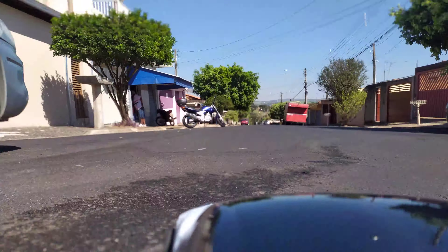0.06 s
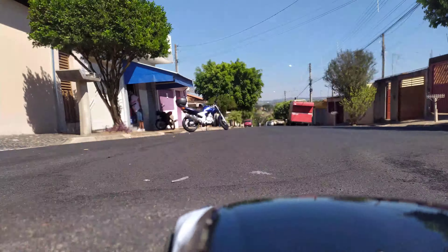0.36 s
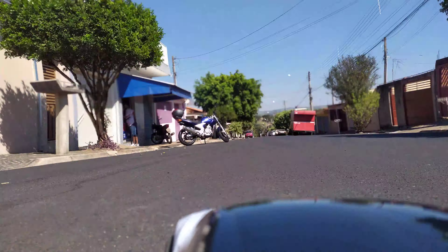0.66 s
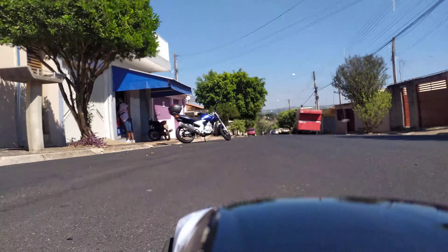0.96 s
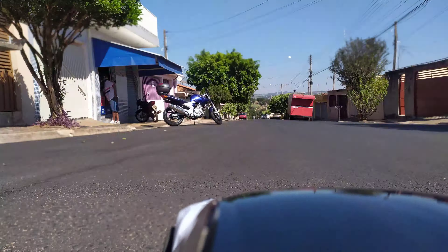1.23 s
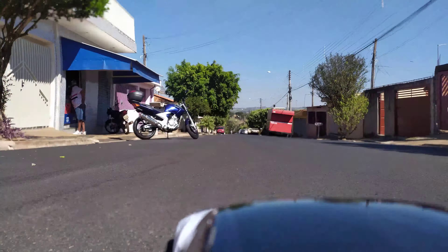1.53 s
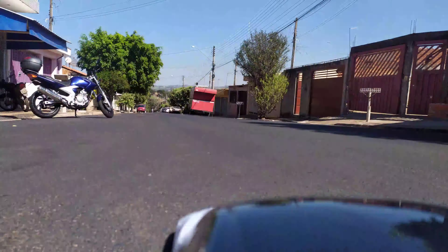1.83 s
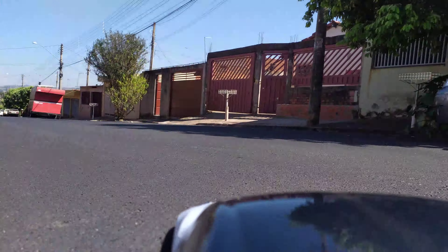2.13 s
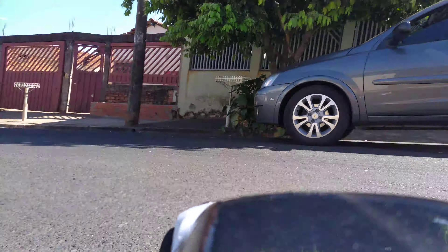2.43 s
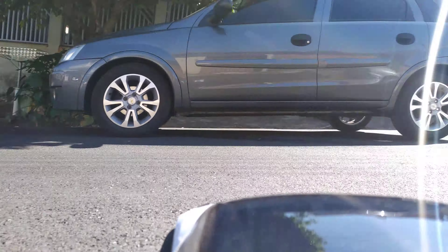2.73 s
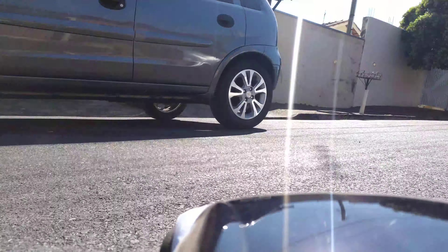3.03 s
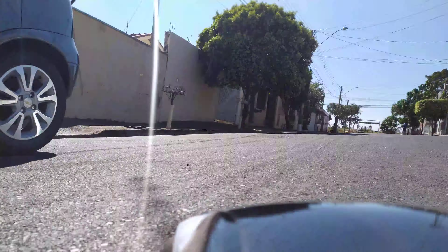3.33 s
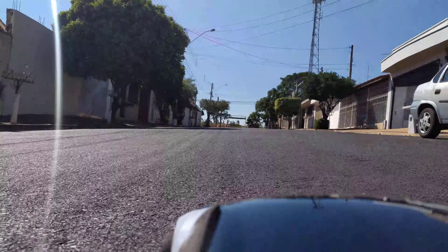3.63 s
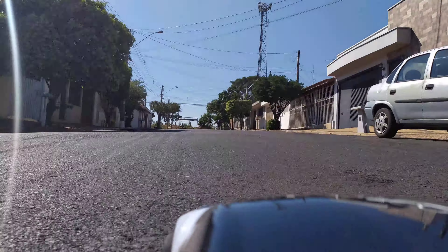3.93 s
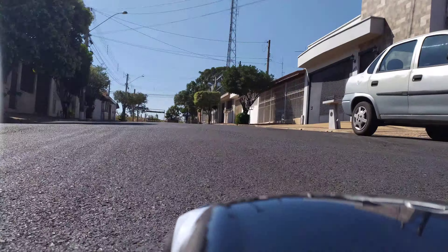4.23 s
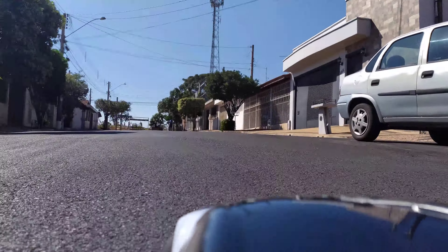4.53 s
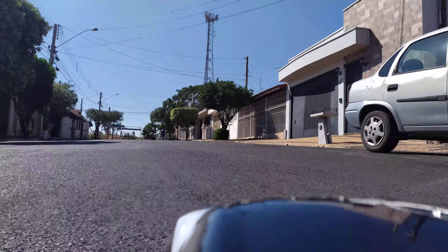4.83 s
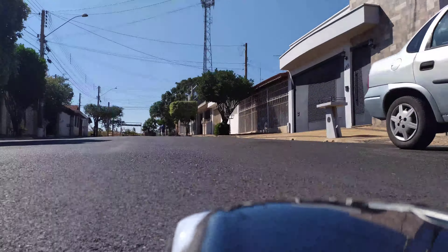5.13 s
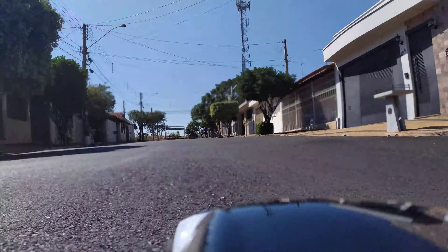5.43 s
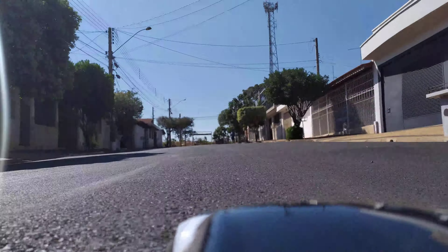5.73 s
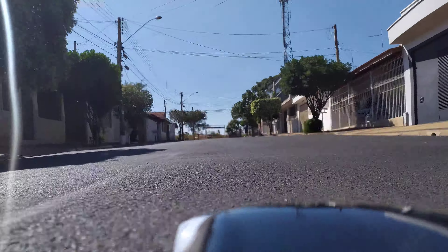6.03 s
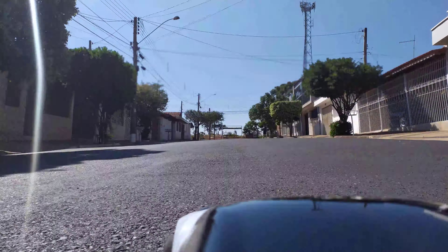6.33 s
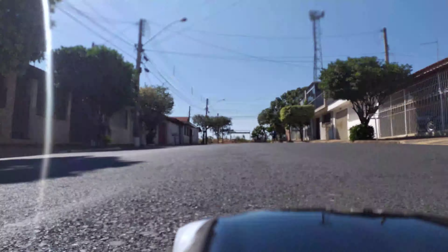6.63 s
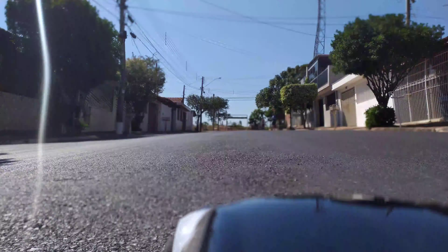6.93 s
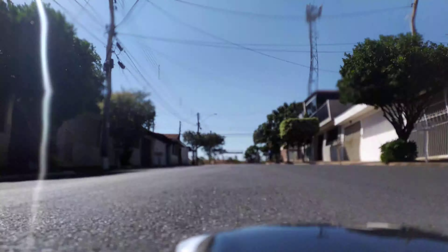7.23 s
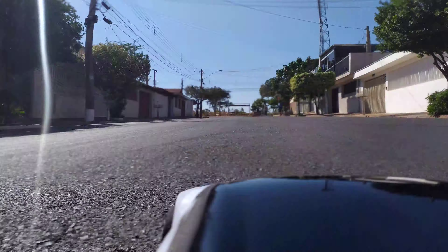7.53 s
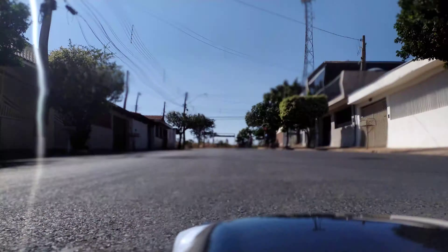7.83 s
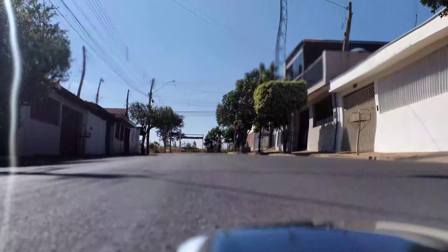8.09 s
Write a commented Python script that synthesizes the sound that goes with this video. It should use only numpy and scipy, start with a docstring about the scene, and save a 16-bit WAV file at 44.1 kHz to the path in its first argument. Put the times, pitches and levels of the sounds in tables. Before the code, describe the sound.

From a microphone riding on a small remote-control car, a raspy electric gear whine sits over gritty tyre noise on asphalt and the low judder of the plastic shell. Bumps thud at first, then the car eases off and everything gets lower and quieter. The motor then winds up to a much higher pitch, while buffeting air and road rumble swell until they dominate and slightly distort.

```python
"""Remote-control car, heard on board

A small electric car with a camera on its body drives along asphalt: it slows, turns round and speeds
away. Its off-centre gears whine and chatter through the chassis resonances over the hum of the motor.
The tyres roar, the body shell shakes, and at speed a rumble of road and air overloads the microphone."""
import sys
import numpy as np
from scipy.fft import rfft, irfft, next_fast_len
from scipy.io import wavfile
from scipy.ndimage import map_coordinates

SR = 44100
rng = np.random.default_rng(int(sys.argv[2]) if len(sys.argv) > 2 else 0)


def file_out(sig):
    """Save sig as 16-bit WAV at sys.argv[1]."""
    # one column per channel
    cols = np.atleast_2d(sig).T
    # limit, then scale
    lim = np.clip(cols, -1, 1)
    pcm = np.round(lim * 32767).astype(np.int16)
    wavfile.write(sys.argv[1], SR, pcm)


N = 364266

# Overtones of the tooth mesh: harmonic, level_db, swing_db (each pinion turn), tight_spot_turns
MESH_OVERTONES = [(1, -3, 5, .42), (2, -3, 6, .25), (3, -4, 9, .38)]
# How hard the gears are driven: time_s, level_db
GEAR_LOAD = [(0, -33.5), (1.4, -33.5), (2.2, -35), (2.6, -41.5), (4.1, -34.5), (4.9, -35), (6.1, -28),
             (6.3, -27.5), (6.55, -24.5), (7.0, -30), (7.4, -30.5), (7.8, -44), (8.26, -41)]
def gears(turns, rasp_db, rattle_db):
    """Teeth mesh harder once a turn of each wheel, so the whine comes in rapid falling chirps."""
    pinion_teeth, spur_teeth = 29, 64
    spur_phase = 2 * np.pi * turns * pinion_teeth / spur_teeth
    pressure_db = 5 * np.cos(spur_phase)
    # off-centre wheels and backlash push each tooth early or late
    off_centre = .17 * np.cos(2 * np.pi * (turns - .31)) + .07 * np.sin(spur_phase)
    backlash = .11 * wobble(200) + .2 * wobble(35)
    teeth = pinion_teeth * turns + off_centre + backlash
    whine = np.zeros(N)
    for harmonic, level_db, swing_db, tight_spot in MESH_OVERTONES:
        # loose bearings make every chirp a little different
        play_db = 4.5 * np.tanh(wobble(130))
        chatter = .9 / np.sqrt(harmonic) * wobble(600)
        contact = unit(amp(pressure_db + play_db + swing_db * np.cos(2 * np.pi * (turns - tight_spot))))
        whine += amp(level_db) * contact * np.sqrt(2) * np.sin(2 * np.pi * harmonic * teeth + chatter)
    # the flanks scrape as they slide
    scrape = unit(amp(pressure_db / 2 + 4 * np.cos(2 * np.pi * (turns - .27))))
    rasp = amp(rasp_db) * scrape * rng.standard_normal(N)
    # once a turn the play is taken up with a tick that rings the gearbox
    ticks = np.diff(np.floor(turns - .12), prepend=-1) * amp(pressure_db + rng.uniform(-3, 3, N))
    rattle = amp(rattle_db) * unit(filtered(ticks, lambda f: ring(f, hz=4780, width_hz=600) ** 2))
    load = amp(curves(GEAR_LOAD)[0])
    return filtered(load * (whine + rasp + rattle), lambda f: chassis(f, geared=True))


# Resonances that colour the gears and the grit: pitch_hz, width_hz, road_gain_db, gear_gain_db
CHASSIS_MODES = [(1604, 245, 0.5, -8.5), (2034, 163, -4.5, 1), (2290, 290, -2, -10), (3000, 440, -4, -11.5),
                 (3490, 640, -5.5, -14.5), (4247, 440, -3, -14.5), (4846, 286, 1, -0.5),
                 (5180, 190, -5, 1.5), (5420, 160, -8, 1), (5944, 330, -4.5, -1.5), (6615, 245, -1, 7),
                 (7300, 110, 0, -16)]
def chassis(f, geared=False):
    """The plastic chassis rings to road or gears and damps the top treble, more so for the gears."""
    modes = sum(amp(gear_db if geared else road_db) * ring(f, hz, width_hz)
                for hz, width_hz, road_db, gear_db in CHASSIS_MODES)
    cutoff_hz = 7450 if geared else 7950
    return modes / (1 + (f / cutoff_hz) ** 30)


# Fader curve of the motor hum: time_s, level_db
HUM_LEVEL = [(0, -47), (2.2, -45), (2.8, -50), (3.3, -41.5), (5.3, -41.5), (5.7, -34), (6.7, -38),
             (7.4, -50)]
def motor(turns):
    """The magnets tug six times a turn: a slightly unsteady hum and its octave."""
    phase = 2 * np.pi * 6 * turns + .5 * wobble(45)
    level_db = curves(HUM_LEVEL)[0] + 2.5 * wobble(25)
    return amp(level_db) * np.sqrt(2) * (np.sin(phase) + amp(-14.5) * np.sin(2 * phase))


# Tone of the tread on asphalt: frequency_hz, level_db
TREAD_SPECTRUM = [(150, -28.5), (290, -11.5), (450, -3.5), (690, 1.5), (900, -5), (1030, -7.5),
                  (1170, -7.5), (1330, -19.5), (2000, -14), (2600, -21.5), (4000, -59)]
# Coarse patches that swell the roar: peak_s, level_db
COARSE_PATCHES = [(0.2, -34), (0.6, -34), (1.1, -38), (1.95, -33.5), (5.6, -32.5), (6.05, -29.5),
                  (6.9, -26), (7.78, -32), (8.0, -25.5)]
def tyres(speed, patter_db, crackle_db):
    """Tread drums on the asphalt, and its grit keeps the chassis rattling; both grow with speed."""
    cruise_turns_per_s = 100
    doublings = np.log2(speed / cruise_turns_per_s)
    roar_level = np.hypot(amp(-31.5 + 5.5 * doublings), swells(COARSE_PATCHES, rise_s=.19, decay_s=.11))
    drumming = roar_level * unit(noise(TREAD_SPECTRUM) * amp(patter_db * wobble(70)))
    crackle = rng.standard_normal(N) * amp(crackle_db * wobble(900))
    grit = amp(-33.5 + 4 * doublings) * unit(filtered(crackle, chassis))
    return drumming + grit


# Steady bed of shell shake: time_s, level_db
SHAKE_LEVEL = [(0, -28), (0.7, -27), (1.5, -32.5), (2.9, -33), (4.1, -25), (5.3, -29), (8.26, -24.5)]
# Lurches that set the shell swinging: peak_s, level_db
SHELL_LURCHES = [(0.02, -17), (0.7, -25), (1.04, -19), (3.4, -28), (5.96, -16), (6.57, -18), (7.0, -17),
                 (7.14, -27), (7.52, -14)]
def body_shell(pitch_hz, gain_db, judder_db):
    """The road keeps the shell shaking at its lowest resonance, with an uneven judder just above."""
    phase = 2 * np.pi * pitch_hz * np.arange(N) / SR + .5 * wobble(6)
    judder = amp(judder_db) * noise([(40, -36.5), (58, 2), (78, 6.5), (110, -8), (160, -20.5), (300, -65)])
    swing = np.hypot(amp(curves(SHAKE_LEVEL)[0]), swells(SHELL_LURCHES, rise_s=.056, decay_s=.07))
    return swing * amp(gain_db + wobble(12)) * (np.sqrt(2) * np.sin(phase) + judder)


# Dark tone of the buffeting: frequency_hz, level_db
BUFFET_SPECTRUM = [(25, -28), (38, -14.5), (52, -2.5), (80, 2), (130, 1), (200, -7.5), (320, -15.5),
                   (500, -24), (900, -37.5), (2000, -50.5), (5000, -67.5)]
# Brighter tone of the eddies: frequency_hz, level_db
EDDY_SPECTRUM = [(25, -23), (38, -17), (52, -6), (90, 4.5), (140, -3), (200, -2.5), (320, -6.5), (500, -13),
                 (900, -28), (2000, -31), (5000, -71)]
# Bed of rumble between the bumps: time_s, level_db
RUMBLE_BED = [(0, -25.5), (0.7, -23), (1.05, -27), (1.55, -42.5), (2.7, -41.5), (3.4, -36), (4.5, -41),
              (5.3, -37), (5.55, -23.5), (6.0, -17), (6.8, -11.5), (7.2, -13.5), (8.26, -10)]
# Thuds from bumps in the asphalt: peak_s, level_db
ROAD_BUMPS = [(0.045, -29), (0.195, -23), (0.335, -16), (0.425, -21), (0.545, -18), (0.695, -16),
              (0.83, -21.5), (1.07, -24.5), (1.33, -25), (2.91, -33), (3.11, -28), (3.56, -28),
              (3.625, -20.5), (3.88, -33), (4.67, -31), (5.6, -14.5)]
def rumble(speed, lumps_db, flutter_db):
    """Road and air buffet, with a thud at each bump; with speed, smaller, brighter eddies take over."""
    eddy_share = (speed / speed.max()) ** 2
    buffet = amp(lumps_db * wobble(45)) * np.sqrt(1 - eddy_share) * noise(BUFFET_SPECTRUM)
    eddies = amp(flutter_db * wobble(110)) * np.sqrt(eddy_share) * noise(EDDY_SPECTRUM)
    level = np.hypot(amp(curves(RUMBLE_BED)[0]), swells(ROAD_BUMPS, rise_s=.025, decay_s=.034))
    return level * (buffet + eddies)


def amp(db):
    """Decibels to gain."""
    return 10 ** (np.asarray(db) / 20)


def unit(x):
    """x scaled to rms 1."""
    return x / np.sqrt(np.mean(x ** 2) + 1e-20)


def curves(rows):
    """One value per sample for each column after the time."""
    times_s, *columns = np.transpose(rows)
    return [np.interp(np.arange(N) / SR, times_s, column) for column in columns]


def swells(rows, rise_s, decay_s):
    """Envelope of (peak_s, level_db) events that each swell to their peak and die away."""
    t = np.arange(N) / SR
    power = np.zeros(N)
    for peak_s, level_db in rows:
        attack = np.clip(1 + (t - peak_s) / rise_s, 0, 1)
        power += (amp(level_db) * attack * np.exp(-np.abs(t - peak_s) / decay_s)) ** 2
    return np.sqrt(power)


def wobble(rate):
    """A smooth random curve, rate knots a second."""
    knots = rng.standard_normal(int(N * rate / SR) + 4)
    return map_coordinates(knots, [np.arange(N) * rate / SR])


def filtered(x, response):
    """x through a filter given as a complex response of frequency."""
    size = next_fast_len(N + SR // 2)
    return irfft(rfft(x, size) * response(np.fft.rfftfreq(size, 1 / SR)), size)[:N]


def noise(spectrum):
    """Noise of rms 1 coloured by (frequency_hz, level_db) points."""
    hz, db = np.transpose(spectrum)
    white = rng.standard_normal(N)
    return unit(filtered(white, lambda f: amp(np.interp(np.log(f + 1), np.log(hz), db))))


def ring(f, hz, width_hz):
    """Response of one resonance."""
    return 1j * f * width_hz / (hz * hz - f * f + 1j * f * width_hz)


# The motor eases off for the turn, then winds up: time_s, speed_turns_per_s
MOTOR_SPEED = [(0, 96.5), (0.35, 97.8), (0.88, 95), (1.26, 92), (1.65, 82), (1.96, 76.7), (2.6, 61.8),
               (3.04, 61.5), (3.22, 64.5), (3.92, 67.1), (4.3, 72), (5.16, 77.3), (5.56, 89.9),
               (5.94, 106.9), (6.1, 119.9), (6.28, 137), (6.78, 177), (7.72, 233.5), (8.26, 258)]
def scene():
    """One motor speed drives gears, hum, tyres and air."""
    speed, = curves(MOTOR_SPEED)
    turns = np.cumsum(speed) / SR
    drive = gears(turns, rasp_db=-3.5, rattle_db=-9.5) + motor(turns)
    road = tyres(speed, patter_db=1.24, crackle_db=3.5)
    shake = body_shell(pitch_hz=52.24, gain_db=-3.5, judder_db=-5)
    return (drive + road + shake + rumble(speed, lumps_db=2, flutter_db=2.43))[None]


def record(dry):
    """The microphone softly flattens the highest peaks; the camera cuts all above its band limit."""
    ceiling, knee, cutoff_hz = .75, 6, 8450
    overloaded = dry[0] / (1 + np.abs(dry[0] / ceiling) ** knee) ** (1 / knee)
    return filtered(overloaded, lambda f: 1 / (1 + (f / cutoff_hz) ** 120))[None]


dry = scene()
out = record(dry)
file_out(out)
```